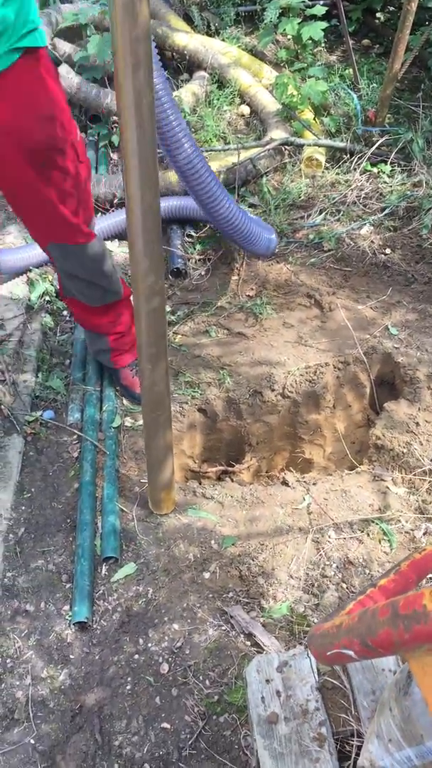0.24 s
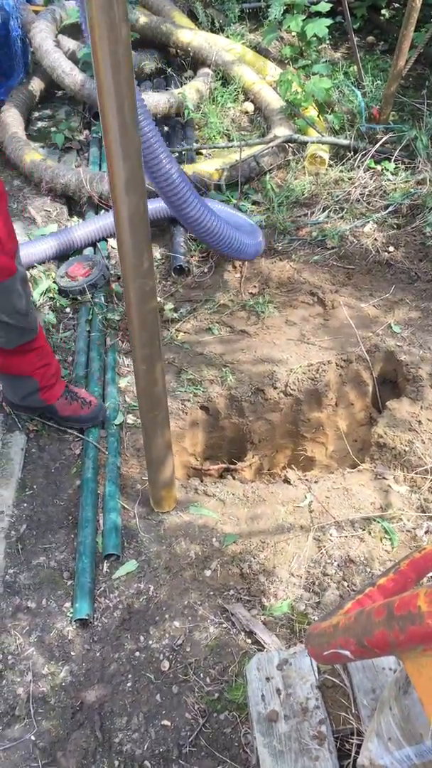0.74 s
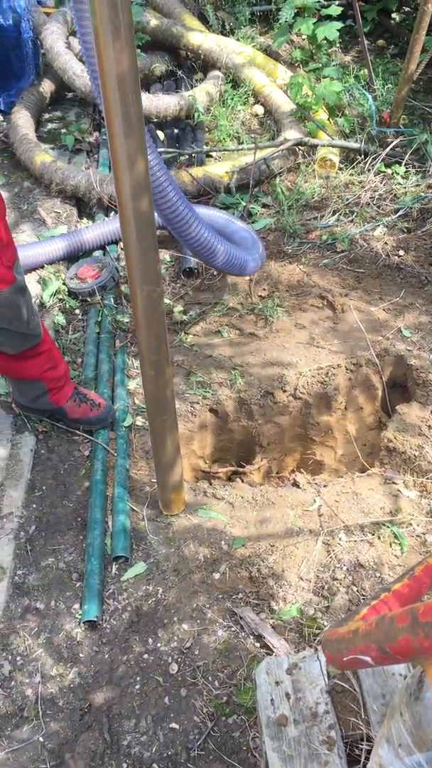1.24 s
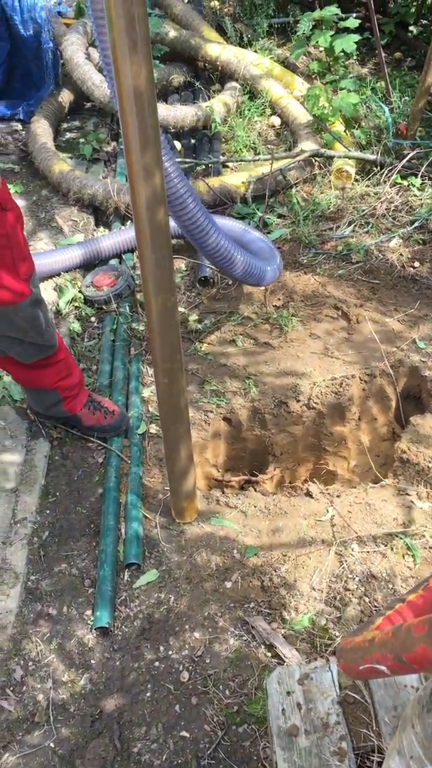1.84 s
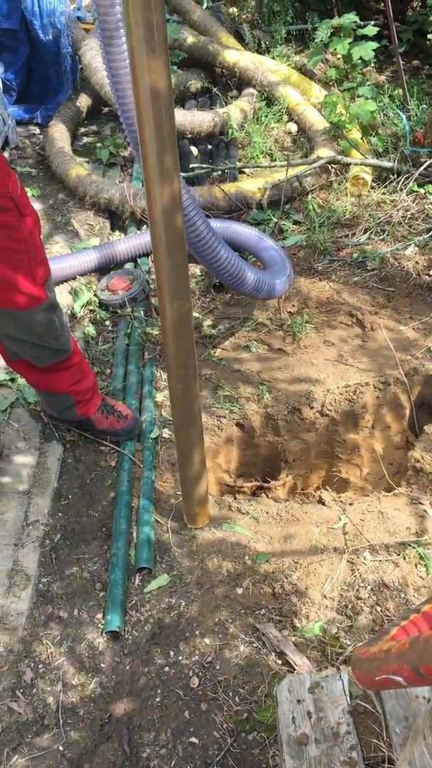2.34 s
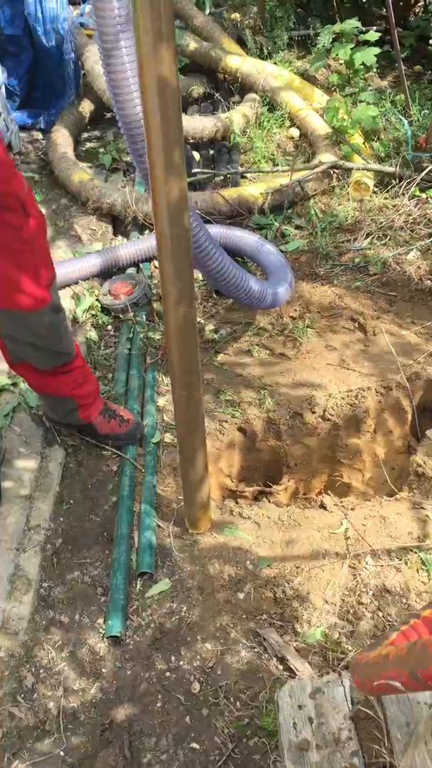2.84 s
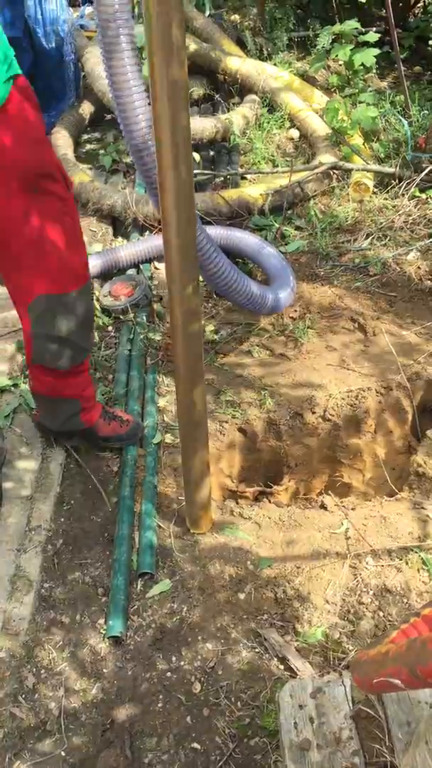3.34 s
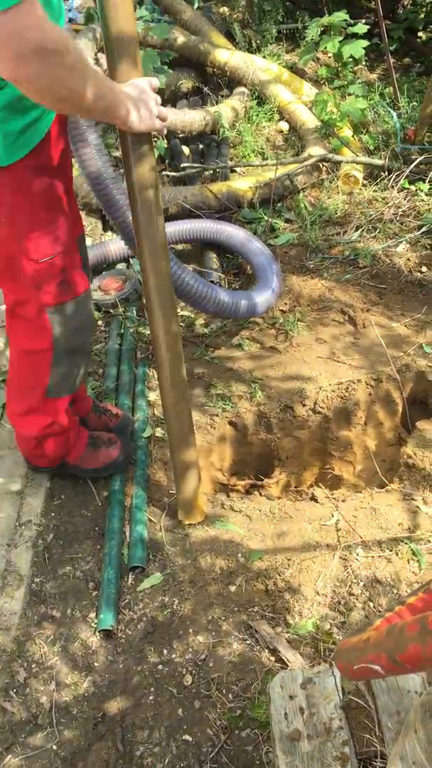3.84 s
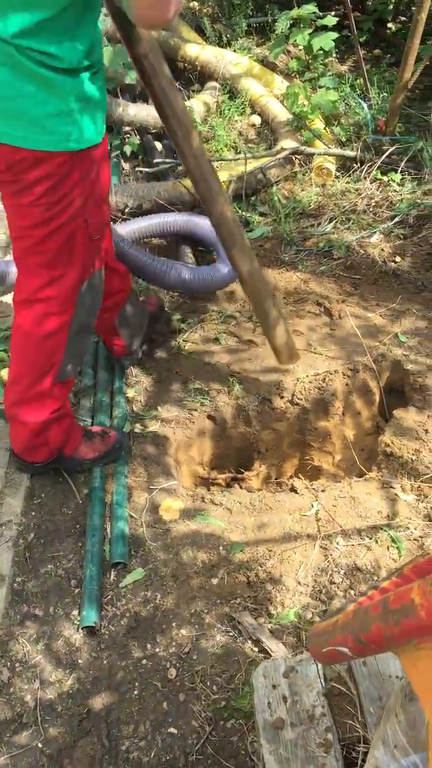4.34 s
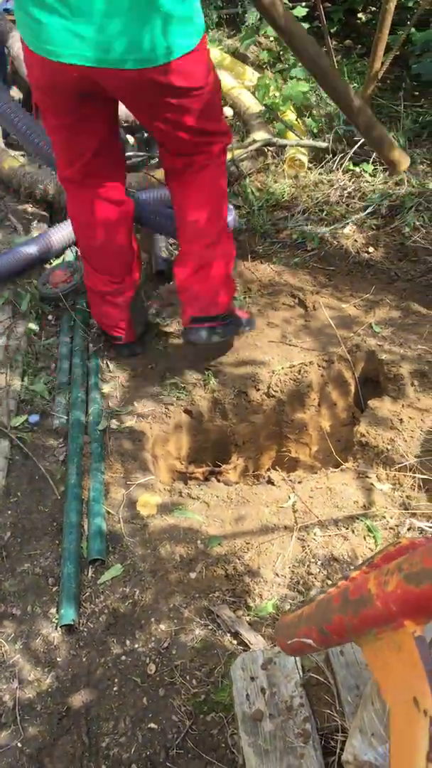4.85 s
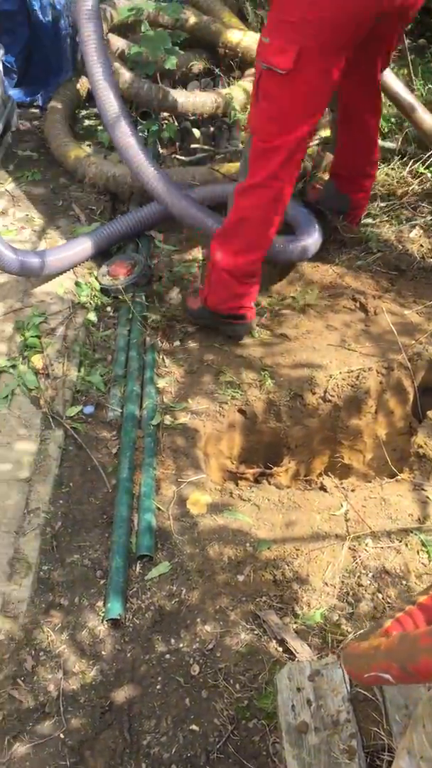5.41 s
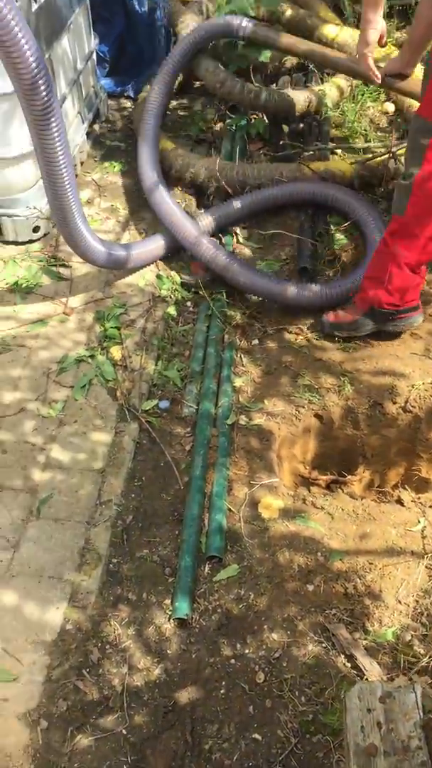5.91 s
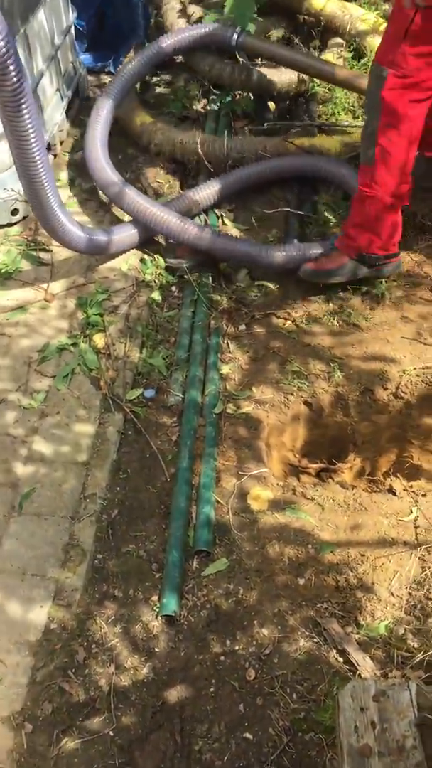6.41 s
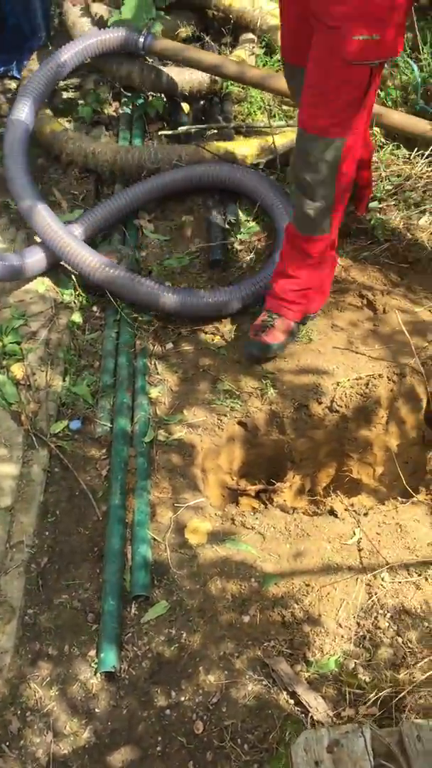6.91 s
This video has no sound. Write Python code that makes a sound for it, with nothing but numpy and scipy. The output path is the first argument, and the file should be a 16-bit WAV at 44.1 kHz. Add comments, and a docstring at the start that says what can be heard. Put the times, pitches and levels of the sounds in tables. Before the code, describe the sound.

Loud rushing suction through a ribbed hose dies with sighs and hollow booms, leaving a clattering, whining engine idle, latch clicks and dull bumps.

```python
"""A soil suction machine with a three-cylinder engine works in a garden: filtered noise rushes through
its ribbed hose, whose resonances colour it, and a narrow noise band whistles over a sharp edge.
At about 2 s the draught dies, the slackening hose sighs in noise bands and booms in gliding sines.
The engine of firing-rate tones, struck noise and gear lines then sinks to a clattering, whining idle.
Later, ringing modes click as latches, and damped sines bump dully among grit as someone steps about."""
import sys
import numpy as np
from scipy import signal
from scipy.fft import rfft, irfft
from scipy.io import wavfile

SR = 44100
rng = np.random.default_rng(int(sys.argv[2]) if len(sys.argv) > 2 else 0)


def unload_audio(sound):
    """Save the sound as a 16-bit wav file, at the path given as the first command line argument."""
    columns = np.transpose(np.atleast_2d(sound))
    # keep every value between -1 and 1, then stretch to whole-number steps
    steps = np.round(np.clip(columns, -1, 1) * 32767)
    wavfile.write(sys.argv[1], SR, steps.astype(np.int16))


N = 316197
TIME = np.arange(N) / SR
FREQ = np.maximum(np.arange(N // 2 + 1) * SR / N, 1)

# exhaust overtones under load and at idle: multiple_of_firing_rate, relative_level_db
LOADED_OVERTONES = [(0.333, -40), (0.667, -39.5), (1.33, -42), (1.67, -48), (2.0, -30), (2.33, -19),
                    (2.67, -33), (3.0, -16), (3.33, -32), (3.67, -50), (4.0, -25.5), (4.33, -39.5),
                    (4.67, -36), (5.0, -24.5), (5.33, -32.5), (5.67, -29.5), (6.0, -49)]
IDLE_OVERTONES = [(0.333, -36), (0.667, -30), (1.33, -18), (1.67, -9.5), (2.0, -13), (2.33, -36),
                  (2.67, -16), (3.0, -21), (3.33, -11.5), (3.67, -15), (4.0, -6), (4.33, -22.5),
                  (4.67, -38), (5.0, -15.5), (5.33, -17), (5.67, -16), (6.0, -48), (6.33, -38.5),
                  (6.67, -21), (7.0, -24.5), (7.33, -37.5), (7.67, -47), (8.0, -29.5)]
# brief dips of the exhaust note: centre_s, spread_s, change_db
EXHAUST_DIPS = [(2.207, 0.02, -17.5), (2.311, 0.012, -12), (2.61, 0.038, -9)]
# spectra of the clattering block and its bright top: frequency_hz, relative_level_db
CLATTER_BODY_SPECTRUM = [(180, -34.5), (300, -6.5), (336, -6), (372, -5.5), (450, -6.5), (511, -8.5),
                         (582, -7), (616, -4.5), (646, -3), (670, -5), (960, -2.5), (1080, -7.5),
                         (1170, -6), (1300, -13), (1570, -7), (1830, -9), (1980, -9), (2240, -14),
                         (2410, -17.5), (2800, -39.5), (3640, -49), (6160, -120)]
CLATTER_TOP_SPECTRUM = [(1410, -25.5), (2400, -5), (2480, -6), (2540, -4.5), (3020, -12), (3200, -10.5),
                        (3800, -14.5), (4150, -19), (4450, -18.5), (5000, -23), (5290, -19.5), (6320, -30),
                        (7480, -24.5), (9380, -35), (13100, -46.5), (16500, -46)]
# spectrum of the housing's rumble: frequency_hz, relative_level_db
RUMBLE_SPECTRUM = [(25, -14), (45, -5), (75, -1.5), (115, -4), (160, -2.5), (195, 3), (240, -10), (285, -8),
                   (330, -15.5)]
# spectra of the draught, low to high, and of the last slack air: frequency_hz, relative_level_db
ROAR_SPECTRUM = [(160, -41), (280, -3), (311, -5.5), (334, -10.5), (384, 2), (468, -9.5), (549, -2),
                 (624, -4), (698, -1), (786, -8.5), (892, 2), (991, -9), (1280, -2.5), (1420, -19),
                 (1500, -11), (1950, -44), (3300, -120)]
HOWL_SPECTRUM = [(820, -19.5), (1400, -3.5), (1520, -3), (1850, 0.5), (2110, 1.5), (2380, -2.5),
                 (2540, -6.5), (2890, -4.5), (3130, -13.5), (3430, -4.5), (3880, -23), (4000, -48.5),
                 (5200, -57.5), (8800, -120)]
HISS_SPECTRUM = [(2240, -44), (3800, -13.5), (4360, -5), (4820, -8), (5500, -6.5), (6080, -2.5), (8370, -6),
                 (9030, -9.5), (9790, -5.5), (10600, -9.5), (11200, -4.5), (11700, -3), (12800, -12),
                 (16200, -15), (17000, -18.5)]
SLACK_AIR_SPECTRUM = [(700, 2), (1000, -8), (1350, -12), (1620, -5), (1900, -1), (2200, -9), (2800, -4),
                      (3300, -3.5), (3900, -16), (5000, -13)]
# sharp air resonances and notches of the hose: frequency_hz, width_hz, lift_db
HOSE_RESONANCES = [(392, 34, 2.5), (630, 31, -12.5), (733, 30, 2), (814, 29, -3), (922, 45, 2),
                   (1304, 21, 6), (1440, 130, -2), (1533, 15, 5.5), (1777, 60, 1.5), (1962, 25, 7.5),
                   (2046, 16, 5.5), (2133, 18, 8.5), (2306, 20, 8.5), (2420, 17, 8), (2770, 55, -2),
                   (2990, 61, 4), (3210, 36, 6), (3320, 33, 4.5), (3550, 40, -13), (3840, 160, -1.5),
                   (4220, 99, 3), (4600, 107, 0.5), (4880, 100, -2), (5200, 90, 4.5), (6050, 510, 1.5),
                   (8640, 200, 4), (9800, 200, 4.5), (11700, 810, -4)]
# gear whine: multiple_of_firing_rate, level_db, centre_s, spread_s
GEAR_LINES = [(13.59, -41.5, 5.2, 2.2), (15.6, -51, 5.0, 1.8), (35.0, -43.5, 5.4, .85),
              (43.0, -50, 5.0, 1.6)]
# flares of the gear at mid pitch: centre_s, spread_s, level_db
GEAR_FLARES = [(4.04, 0.1, -47), (4.477, 0.055, -42.5), (4.778, 0.05, -38), (5.636, 0.047, -43),
               (6.138, 0.1, -49)]
# brief breathy bands as the draught dies, most of them last sighs of air in the hose: centre_s, spread_s,
# pitch_hz, width_hz, level_db
SIGH_BANDS = [(2.04, 0.14, 392, 27.78, -30.5), (2.11, .1, 885, 50, -27.5), (2.16, 0.069, 610, 40, -34),
              (2.03, 0.047, 1700, 49.5, -38), (2.2, 0.028, 2220, 200, -30.5), (2.187, 0.046, 1300, 70, -33),
              (2.19, 0.08, 2830, 320, -35.5), (2.19, .06, 3400, 300, -38), (2.2, 0.059, 8350, 350, -46),
              (2.4, 0.11, 1610, 280, -38.5), (2.56, .07, 2740, 83, -55)]
# booms of the emptying hose: centre_s, spread_s, pitch_hz, glide_hz_per_s, level_db
HOSE_BOOMS = [(2.18, 0.04, 136, 110, -18), (2.39, 0.044, 174, 202, -25), (2.46, 0.029, 139, 0, -23),
              (2.534, 0.027, 100, 2, -20.5), (2.63, 0.058, 145.2, -6, -17), (2.66, 0.05, 203.6, -60, -35),
              (2.725, 0.02, 170, -2, -22.5), (2.76, 0.06, 77.4, 0, -28), (2.795, 0.011, 149, -100, -19)]
# lines of the shrill whine: multiple_of_firing_rate, relative_level_db
SHRILL_OVERTONES = [(50.67, -9), (51.67, -6), (52.67, 0), (53.67, -14), (58.0, -13)]
# spells in which the shrill whine flares up: start_s, end_s, level_db
SHRILL_FLARES = [(2.563, 2.9, -54.5), (2.934, 3.328, -49), (3.565, 4.646, -51.5), (6.58, 6.88, -58)]
# latch clicks: start_s, peak_db, brightness_centre_hz, spread_octaves, scattered_tail_strength
LATCH_CLICKS = [(4.742, -41, 14000, .7, .5), (4.7418, -23, 1700, 1, 4.2), (5.8408, -15, 1650, 0.7, 2.4),
                (5.8405, -29, 4800, 0.64, 1.2), (5.8445, -20.5, 1500, 0.5, 1.5), (5.854, -21, 1950, 0.7, 3),
                (6.321, -35, 6300, 0.3, 1.2)]
# vibration modes of a latch: frequency_hz, relative_level_db, t60_s
LATCH_MODES = [(780, 0, .03), (1410, 12, 0.02), (1510, 15, 0.024), (1610, 9, 0.022), (1700, 3, .07),
               (1990, 0, .04), (2370, 7, 0.025), (2930, 6, .015), (3300, 1, 0.014), (3750, -7, 0.012),
               (6450, 3, .015), (6750, 4, .015), (7800, -4, .015), (11200, -5, .015), (16300, -6, .015)]
# hose and boots brushing the soil: centre_s, spread_s, level_db
SOIL_BRUSHES = [(5.23, .04, -66), (5.42, .09, -68), (5.945, .02, -66), (6.2, .025, -63),
                (6.262, 0.018, -57), (6.32, .025, -64), (6.52, .1, -66)]
# dull bumps: start_s, level_db, pitch_hz
DULL_BUMPS = [(6.484, -11.5, 91), (6.614, -17.5, 92), (7.035, -21, 158)]

# the governor drops the engine from working speed to idle; rates in firings per second
WORK_HZ, IDLE_HZ, THROTTLE_AT_S, THROTTLE_EASE_S = 61.55, 46.16, 2.58, .088
# the idle undershoots a little, then recovers
UNDERSHOOT_HZ, RECOVER_AT_S, RECOVER_EASE_S = .45, 3.5, .15
EXHAUST_WORK_DB, EXHAUST_IDLE_DB = -15, -25.5
# the exhaust note swells just before the throttle closes
STRAIN_AT_S, STRAIN_S, STRAIN_DB = 2.22, 0.12, 4.5
# reference levels, to which the clatter's body and top add theirs
CLATTER_WORK_DB, CLATTER_IDLE_DB, CLATTER_AT_S, CLATTER_EASE_S = -41, -37, 2.81, 0.16
RUMBLE_WORK_DB, RUMBLE_IDLE_DB, RUMBLE_SHAKE_DB, RUMBLE_DB_PER_S = -31, -34.5, 3.5, 0.78
TURBINE_WORK_HZ, TURBINE_IDLE_HZ, TURBINE_DB = 6250, 4800, -58
TURBINE_LAG_S, TURBINE_LAG_SHARE = .25, .2
FLUTTER_DB = 0.75   # spread of the draught's roar and howl
WHISTLE_HZ, WHISTLE_RISE_FROM_S, WHISTLE_RISE_HZ_PER_S, WHISTLE_SAG_DB_PER_S = 11610, 1.34, 1600, 9
WAVER_TURNS = 0.018   # phase wander of the gear and shrill whines
FLARE_MULTIPLE, FLARE_REST_DB = 19.36, -50   # the flaring gear, and its level between flares
SIGH_SINK_PER_S = 0.29   # share of the pitch
SHRILL_IDLE_DB, SHRILL_EASE_S = -53.5, 0.0082
GRAINS_PER_S = 4000
CUTOFF_HZ = 16900


def from_db(db):
    """Logarithmic level law: decibels become an amplitude ratio."""
    return 10 ** (np.asarray(db) / 20)


def rms_one(x):
    """Power normalisation: scale to rms 1."""
    return x / np.sqrt(np.mean(x ** 2) + 1e-20)


def white():
    """Random excitation: fresh white noise."""
    return rng.standard_normal(N)


def colour(x, points, lift_db=0):
    """Linear filtering: shape the spectrum, falling steeply beyond its ends; rms 1."""
    hz, db = np.transpose(points)
    octaves_outside = np.maximum(np.log2(hz[0] / FREQ), 0) + np.maximum(np.log2(FREQ / hz[-1]), 0)
    shape_db = np.interp(np.log(FREQ), np.log(hz), db) - 60 * octaves_outside
    return rms_one(irfft(rfft(x) * from_db(shape_db + lift_db), N))


def drift(rate_hz):
    """Low-passed chance: about this many swings a second, with spread 1."""
    hz = np.arange(2049) * SR / N
    slow = irfft(rfft(rng.standard_normal(4096)) / (1 + (hz / rate_hz) ** 2) ** 2)
    return np.interp(np.linspace(0, len(slow) - 1, N), np.arange(len(slow)), rms_one(slow))


def tone(turns):
    """Simple harmonic motion: a sine of rms 1 from its phase in turns."""
    return np.sqrt(2) * np.sin(2 * np.pi * turns)


def breathy_tone(hz, width_hz):
    """Narrow-band turbulence: low-passed complex noise shifted to a moving centre; rms 1."""
    sos = signal.butter(2, width_hz / 2, fs=SR, output="sos")
    cloud = signal.sosfilt(sos, white() + 1j * white())
    carrier = np.exp(2j * np.pi * np.cumsum(hz) / SR)
    return rms_one(np.real(cloud * carrier))


def ring(contact, hz, t60_s):
    """Damped resonance: a two-pole mode that a unit click sets ringing at height 1."""
    radius, angle = from_db(-60 / (t60_s * SR)), 2 * np.pi * hz / SR
    poles = [1, -2 * radius * np.cos(angle), radius * radius]
    return signal.lfilter([0, np.sin(angle)], poles, contact + 1e-18)


def swell(centre_s, spread_s):
    """Gaussian envelope: a smooth rise and fall, 1 at its centre."""
    return np.exp(-.5 * ((TIME - centre_s) / spread_s) ** 2)


def step(at_s, ease_s):
    """Smooth transition: 0 to 1 along a hyperbolic tangent."""
    return .5 + .5 * np.tanh((TIME - at_s) / (2 * ease_s))


def since(from_s):
    """Elapsed time: seconds gone by after a moment, zero before it."""
    return np.maximum(TIME - from_s, 0)


def fade(level_db, from_s, fall_db_per_s):
    """Exponential decay: a level in decibels that holds, then falls steadily."""
    return level_db - fall_db_per_s * since(from_s)


def exhaust(turns, load, loaded_db, idle_db, unsteady):
    """Periodic pulsation: the firing note, with lines at thirds of its rate from unequal cylinders."""
    note = from_db(EXHAUST_WORK_DB) * load + from_db(EXHAUST_IDLE_DB) * (1 - load)
    swing_db = STRAIN_DB * swell(STRAIN_AT_S, STRAIN_S)
    for centre_s, spread_s, change_db in EXHAUST_DIPS:
        swing_db += change_db * swell(centre_s, spread_s)
    out = note * from_db(swing_db) * tone(turns)
    loaded_gain, idle_gain = from_db(loaded_db) * load, from_db(idle_db) * (1 - load)
    for overtones, gain in (LOADED_OVERTONES, loaded_gain), (IDLE_OVERTONES, idle_gain):
        for multiple, db in overtones:
            thirds = round(multiple * 3)
            line = tone(turns * thirds / 3 + rng.random())
            out += gain * from_db(db) * (1 + unsteady * drift(3.8)) * line
    return out


def firings(turns, jitter_s, spread_db, count=3):
    """Impulsive excitation: one train of slightly uneven clicks for each cylinder."""
    at = np.flatnonzero(np.diff(np.floor(turns)) > 0)
    chance = rng.standard_normal((len(at), 2))
    at = np.clip(at + (chance[:, 0] * jitter_s * SR).astype(int), 0, N - 1)
    trains = np.zeros((count, N))
    trains[np.arange(len(at)) % count, at] = from_db(spread_db * chance[:, 1])
    return trains


def clatter(turns, knock_t60_s, loose, throb, body_db, top_db):
    """Impulse response: each cylinder knocks the block in its own way; loose parts add pulsing noise."""
    age = TIME[:SR // 10]
    decay = from_db(-60 * age / knock_t60_s)
    knocks = np.zeros(N)
    for train in firings(turns, jitter_s=.0001, spread_db=2.0):
        response = decay * rng.standard_normal(len(age))
        knocks += signal.fftconvolve(train, response)[:N]
    knocks = rms_one(knocks)
    pulse = 1 + throb * np.cos(4 * np.pi * turns)   # two valves seat for each firing
    body = from_db(body_db) * colour(knocks + loose * white() * pulse, CLATTER_BODY_SPECTRUM)
    top = colour(0.7 * knocks + white() * pulse, CLATTER_TOP_SPECTRUM)
    top *= from_db(top_db + 0.6 * drift(25))
    idling = step(CLATTER_AT_S, CLATTER_EASE_S)
    return from_db(CLATTER_WORK_DB * (1 - idling) + CLATTER_IDLE_DB * idling) * (body + top)


def rumble(load):
    """Forced vibration: the housing's low noise shakes as the engine slows, then builds up at idle."""
    idle_db = RUMBLE_IDLE_DB + RUMBLE_DB_PER_S * since(THROTTLE_AT_S)
    braking = 4 * load * (1 - load)   # 1 at the middle of the slowing
    level_db = RUMBLE_WORK_DB * load + idle_db * (1 - load) + RUMBLE_SHAKE_DB * braking
    return from_db(level_db) * colour(white(), RUMBLE_SPECTRUM)


def turbine(load, width_hz, overtone_db, overtone_width_hz):
    """Rotational inertia: breathy bands follow the engine's speed down but settle late."""
    late = np.exp(-since(THROTTLE_AT_S) / TURBINE_LAG_S)
    speed = load + TURBINE_LAG_SHARE * (1 - load) ** 2 * late
    hz = TURBINE_IDLE_HZ + (TURBINE_WORK_HZ - TURBINE_IDLE_HZ) * speed
    overtone = np.sqrt(1 - load) * from_db(overtone_db) * breathy_tone(1.52 * hz, overtone_width_hz)
    bands = from_db(TURBINE_DB) * (breathy_tone(hz, width_hz) + overtone)
    # a narrower, clearer sigh swells around 3 s
    sigh = from_db(-58) * swell(centre_s=3, spread_s=0.5) * breathy_tone(hz, width_hz=240)
    return bands + sigh


def hose_response(ripple_db):
    """Pipe resonance: sharp peaks and notches, with a comb from standing waves in a metre of pipe."""
    response_db = sum(db * np.exp(-2 * ((FREQ - hz) / width) ** 2) for hz, width, db in HOSE_RESONANCES)
    comb = np.cos(2 * np.pi * FREQ / 166.4)
    depth = np.interp(FREQ, [2510, 6000, 9000, 13020], [0.19, 1.0, 0.95, .3])
    return response_db + ripple_db * comb * depth


def roar(hose_db):
    """Low turbulence: hose-coloured noise that surges before the draught dies."""
    level_db = fade(level_db=-26, from_s=1.994, fall_db_per_s=31)
    level_db += 6 * swell(centre_s=1.96, spread_s=0.21)
    return from_db(level_db + FLUTTER_DB * drift(38)) * colour(white(), ROAR_SPECTRUM, hose_db)


def howl(hose_db, slack_db):
    """Resonant turbulence: the hose's howl crossfades at equal power into slack air."""
    level_db = fade(level_db=-19.3, from_s=1.977, fall_db_per_s=48)
    slack = np.interp(TIME, [2.17, 2.42], [0, 1])
    howling = np.sqrt(1 - slack) * colour(white(), HOWL_SPECTRUM, hose_db)
    slackening = np.sqrt(slack) * from_db(slack_db) * colour(white(), SLACK_AIR_SPECTRUM)
    return from_db(level_db + FLUTTER_DB * drift(34)) * (howling + slackening)


def hiss(hose_db, dulling):
    """Jet noise: high turbulence whose upper part weakens faster as the flow slows."""
    level_db = fade(level_db=-26.77, from_s=2.183, fall_db_per_s=35)
    level_db -= 12.5 * since(1.71)   # it sags before it dies
    jet = colour(white(), HISS_SPECTRUM, hose_db)
    dull = signal.sosfilt(signal.butter(1, 6500, fs=SR, output="sos"), jet)
    bright = from_db(dulling * (level_db - level_db[0]))
    return from_db(level_db + 0.8 * drift(30)) * (dull + bright * (jet - dull))


def whistle():
    """Edge tone: air over a sharp edge makes a narrow band that glides up, weakens and breaks off."""
    rising_s = np.minimum(since(WHISTLE_RISE_FROM_S), 1)
    hz = WHISTLE_HZ + WHISTLE_RISE_HZ_PER_S * rising_s
    level_db = fade(level_db=-30.5, from_s=1.68, fall_db_per_s=146) - WHISTLE_SAG_DB_PER_S * rising_s
    edge_tone = breathy_tone(hz + 18 * drift(20), width_hz=140)
    halo = 0.79 * breathy_tone(hz, width_hz=880)
    return from_db(level_db + 0.8 * drift(13.4)) * (edge_tone + halo)


def suction():
    """Flow noise: the parts of the draught sound together, and the last of it closes by 2.7 s."""
    hose_db = hose_response(ripple_db=4.0)
    draught = roar(hose_db) + howl(hose_db, slack_db=-0.5) + hiss(hose_db, dulling=.8) + whistle()
    return draught * np.interp(TIME, [2.45, 2.7], [1, 0])


def gear_whine(turns, firing_hz):
    """Tooth meshing: lines locked to the engine's speed, swelling fitfully at idle."""
    # the lowest gear first sings hoarsely around 1 s
    hoarse = breathy_tone(firing_hz * GEAR_LINES[0][0], width_hz=55)
    out = from_db(-38) * swell(centre_s=1, spread_s=0.2) * hoarse
    idling = step(2.9, 0.18)
    for multiple, db, centre_s, spread_s in GEAR_LINES:
        line = tone(turns * multiple + WAVER_TURNS * drift(7.5))
        out += idling * swell(centre_s, spread_s) * from_db(db + 2.0 * drift(4.2)) * line
    flares = from_db(FLARE_REST_DB) * step(3.7, .1)
    for centre_s, spread_s, db in GEAR_FLARES:
        flares += from_db(db) * swell(centre_s, spread_s)
    return out + flares * tone(turns * FLARE_MULTIPLE + 0.12 * drift(30))


def sighs(rough_db):
    """Resonant flow: brief breathy bands swell and sink in pitch; most are the last air sighing through narrow
    hose resonances."""
    out = np.zeros(N)
    for centre_s, spread_s, hz, width_hz, db in SIGH_BANDS:
        sinking_hz = hz * (1 - SIGH_SINK_PER_S * np.clip(TIME - centre_s, -1, 1))
        level = from_db(db + rough_db * drift(45)) * swell(centre_s, spread_s)
        out += level * breathy_tone(sinking_hz, width_hz)
    return out


def booms(rough_db, wobble):
    """Air-column resonance: short, rough, overlapping notes swell while the pressure evens out."""
    out = np.zeros(N)
    for centre_s, spread_s, hz, glide, db in HOSE_BOOMS:
        age = TIME - centre_s
        turns = hz * age + glide * age ** 2 / 2 + wobble * drift(30)
        out += from_db(db + rough_db * drift(45)) * swell(centre_s, spread_s) * tone(turns)
    return out


def shrill_whine(turns):
    """Line spectrum: high lines locked to the engine flicker faintly at idle and flare up in spells."""
    wander = WAVER_TURNS * drift(14)
    level = from_db(SHRILL_IDLE_DB) * step(SHRILL_FLARES[1][0], SHRILL_EASE_S)
    for start_s, end_s, db in SHRILL_FLARES:
        level += from_db(db) * (step(start_s, SHRILL_EASE_S) - step(end_s, SHRILL_EASE_S))
    lines = sum(from_db(db) * tone(turns * multiple + wander) for multiple, db in SHRILL_OVERTONES)
    return level * from_db(1.9 * drift(25)) * lines


def latches(scrape_s, scrape, crack, scatter_t60_s):
    """Modal excitation: gritty contacts ring the latch's modes, with a short tail scattered by the yard."""
    out = np.zeros(N)
    age = TIME[:SR // 5]
    for start_s, peak_db, centre_hz, octaves, scatter in LATCH_CLICKS:
        contact = (age == 0) + scrape * rng.standard_normal(len(age)) * np.exp(-age / scrape_s)
        modes = sum(from_db(db) * ring(contact, hz, t60_s) for hz, db, t60_s in LATCH_MODES)
        tail = scatter * rng.standard_normal(len(age)) * from_db(-60 * age / scatter_t60_s)
        click = crack * contact + modes + tail
        edges = np.clip(centre_hz * 2. ** np.array([-octaves, octaves]), 20, .45 * SR)
        click = signal.sosfilt(signal.butter(1, edges, "band", fs=SR, output="sos"), click)
        click = signal.sosfilt(signal.butter(2, edges[1], fs=SR, output="sos"), click)
        at = round(start_s * SR)
        out[at:at + len(age)] += from_db(peak_db) * click / np.abs(click).max()
    return out


def footwork(bump_s, grain_db):
    """Granular friction and damped impact: clumps of grit are brushed, and soft bumps die quickly."""
    grains = (rng.random(N) < GRAINS_PER_S / SR) * white() * from_db(grain_db * drift(150))
    grit = colour(grains, [(3000, -2), (7000, 7), (9500, -2), (12500, -5), (17000, -15)])
    out = grit * sum(from_db(db) * swell(centre_s, spread_s) for centre_s, spread_s, db in SOIL_BRUSHES)
    for start_s, db, hz in DULL_BUMPS:
        age = since(start_s)
        envelope = age / bump_s * np.exp(1 - age / bump_s)
        out -= from_db(db) * envelope * np.sin(2 * np.pi * hz * age)
    return out


def scene():
    """Superposition: engine, draught and small noises add in the open air."""
    load = 1 - step(THROTTLE_AT_S, THROTTLE_EASE_S)
    idle_hz = IDLE_HZ - UNDERSHOOT_HZ * (1 - step(RECOVER_AT_S, RECOVER_EASE_S))
    firing_hz = WORK_HZ * load + idle_hz * (1 - load)
    turns = np.cumsum(firing_hz) / SR
    engine = exhaust(turns, load, loaded_db=-15.0, idle_db=-25.5, unsteady=0.062)
    engine += clatter(turns, knock_t60_s=0.29, loose=0.76, throb=0.083, body_db=3.0, top_db=-9.8)
    engine += rumble(load)
    engine += turbine(load, width_hz=540, overtone_db=-8.5, overtone_width_hz=630)
    engine += gear_whine(turns, firing_hz) + shrill_whine(turns)
    hose = suction() + sighs(rough_db=2) + booms(rough_db=1.5, wobble=0.027)
    clicks = latches(scrape_s=0.0017, scrape=0.05, crack=12, scatter_t60_s=.11)
    steps = footwork(bump_s=0.0071, grain_db=2)
    return (engine + hose + clicks + steps)[None]


def record(dry):
    """Band limiting: the ends are eased and the top is cut steeply."""
    eased = dry * np.interp(TIME, [0, .006, TIME[-1] - .003, TIME[-1]], [0, 1, 1, 0])
    return signal.sosfilt(signal.ellip(10, .1, 80, CUTOFF_HZ, fs=SR, output="sos"), eased)


dry = scene()
out = record(dry)
unload_audio(out)
```